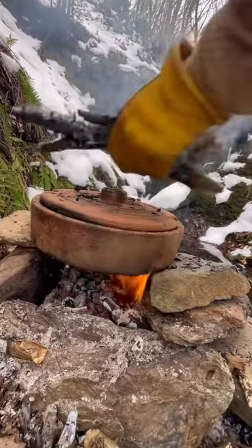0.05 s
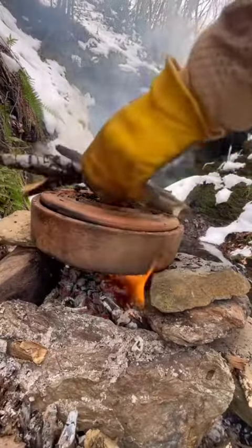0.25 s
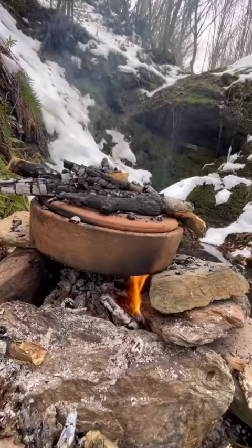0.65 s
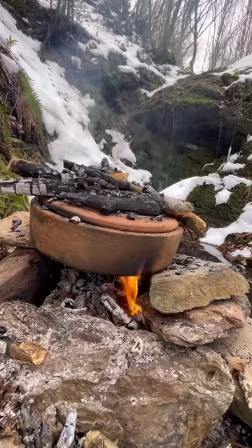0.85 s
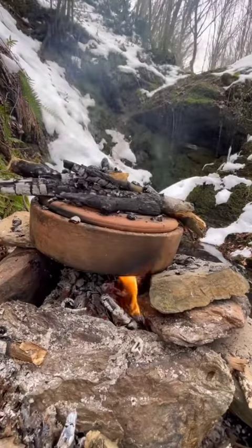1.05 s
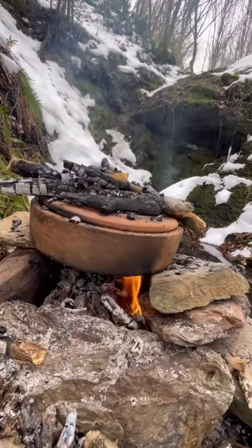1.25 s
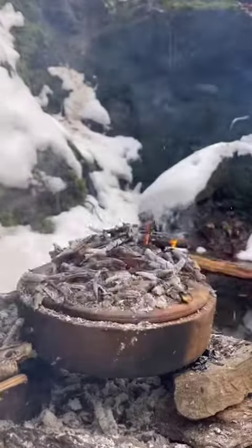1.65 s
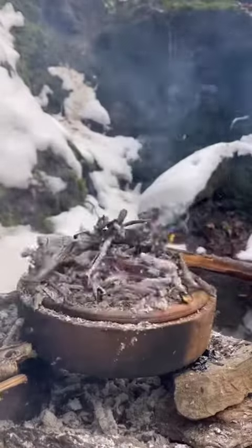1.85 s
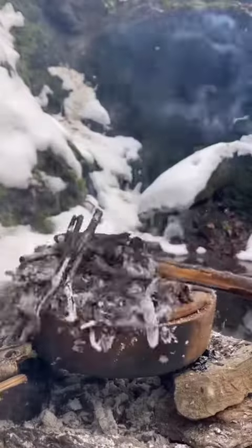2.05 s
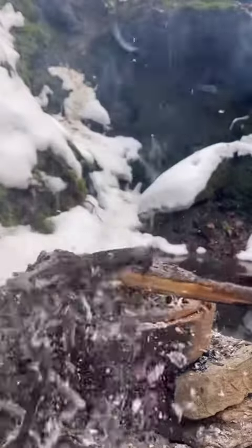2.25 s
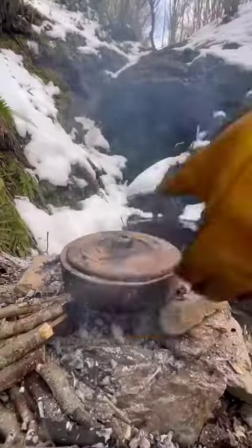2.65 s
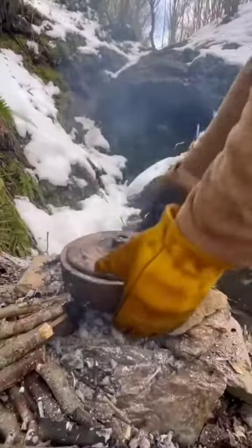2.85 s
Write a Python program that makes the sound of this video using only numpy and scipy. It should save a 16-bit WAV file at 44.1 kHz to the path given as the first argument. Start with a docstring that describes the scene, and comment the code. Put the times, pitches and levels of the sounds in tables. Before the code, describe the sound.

Charred logs clack and crunch onto a clay lid from about 0.2 to 0.6 seconds, making it ring briefly. A quiet outdoor fire hisses, with embers ticking. From 1.7 seconds a stick pushes ash and burnt wood off in a growing, gritty rush, with a log thud at 2.1, then clinks, raps and low rumble. Ash lands with soft thumps near 2.6 seconds and flakes settle, all heard up close.

```python
"""An outdoor fire hisses and murmurs under a pot while charcoal rustles in a glove. Charred logs
are set down on the pot's clay lid: they crunch, clack and make the clay ring as they rock to rest.
Embers tick and flames flap softly. Then a stick pushes the burnt wood and ash off the lid in a
gritty, sliding rush: chunks clink, logs bump and the stick raps the clay over a low rumble.
Last, heaps of ash land with soft thumps and the loose flakes settle."""
import sys
import numpy as np
from scipy import signal
from scipy.fft import rfft, irfft
from scipy.io import wavfile

SR = 44100
rng = np.random.default_rng(int(sys.argv[2]) if len(sys.argv) > 2 else 0)


def transcribe(u):
    """Save the signal u as a 16-bit wav file named by the first command-line argument.

    u: samples, shape (n,) or (channels, n), limited to [-1, 1]; the rate is SR.
    q: integer samples, one column per channel.
    """
    v = np.clip(np.atleast_2d(u).T, -1, 1)
    q = np.round(v * 32767).astype(np.int16)
    wavfile.write(sys.argv[1], SR, q)


N = 132300
T = np.arange(N) / SR


def amp(db):
    """Turns decibels into a number to multiply a sound by."""
    return 10 ** (np.asarray(db) / 20)


def unit(x):
    """Scales a sound to an average power of 1."""
    return x / np.sqrt(np.mean(x ** 2) + 1e-20)


def level(points):
    """A loudness curve drawn through (t/s, level/dB) points."""
    return amp(np.interp(T, *np.transpose(points)))


def colour(x, points):
    """Shapes the bass and treble of a sound to follow (f/Hz, level/dB) points."""
    hz, db = np.transpose(points)
    log_hz = np.log(abs(np.fft.fftfreq(4096, 1 / SR)) + 1)
    log_gain = np.log(amp(np.interp(log_hz, np.log(hz + 1), db)))
    response = np.exp(np.conj(signal.hilbert(log_gain)))  # nothing rings ahead of the sound
    taps = np.fft.ifft(response).real[:2048]
    return signal.fftconvolve(x, taps)[:len(x)]


def noise(points):
    """Steady noise with the tone given by (f/Hz, level/dB) points."""
    return unit(colour(rng.standard_normal(N), points))


def spread(mid, side):
    """Makes left and right channels: bass in the middle, treble wider."""
    # stereo width, as the gain of the side signal: f/Hz, level/dB
    width = [(30, -28), (130, -35), (400, -14.5), (1000, -10.5), (2000, -32.5), (3000, -8.5), (4500, -7),
             (6500, -4), (9000, -10.5), (12000, -10)]
    side = colour(side, width)
    return np.array([mid + side, mid - side])


def add(mix, s, sound):
    """Mixes a sound in, starting at s seconds."""
    part = mix[max(round(s * SR), 0):][:len(sound)]
    part += sound[:len(part)]


def ring(modes, build_cycles=0.91):
    """A struck object: each of its tones (f/Hz, level/dB, fade/s) swells, then falls 60 dB per fade."""
    t = T[:SR // 3]
    out = np.zeros(len(t))
    for hz, db, fade_s in modes:
        swell = 1 - np.exp(-(t * hz / build_cycles) ** 2)
        out += amp(db - 60 * t / fade_s) * swell * np.sin(2 * np.pi * hz * t)
    return out


def burst(fade_s, rise_s):
    """The loudness curve of a brittle snap: a quick rise, and a fall of 60 dB in fade_s."""
    t = T[:SR // 4]
    return np.minimum(t / rise_s, 1) * amp(-60 * t / fade_s)


def grit(points, per_s, spread_db, smooth):
    """Tiny cracks of uneven size, in stereo; smooth is the share of plain hiss mixed in."""
    size = amp(spread_db * np.minimum(rng.exponential(1, N), 5))
    size *= rng.random(N) < per_s / SR
    pair = []
    for _ in range(2):
        cracks = unit(size * rng.choice([-1, 1], N))
        grains = np.sqrt(1 - smooth) * cracks + np.sqrt(smooth) * rng.standard_normal(N)
        pair.append(unit(colour(grains, points)))
    return spread(*pair)


def flutter(rate_hz, depth_db):
    """A random wobble in loudness, up to about rate_hz."""
    hz = np.fft.rfftfreq(N, 1 / SR)
    band = hz / (hz + rate_hz / 10) / (1 + (hz / rate_hz) ** 4)
    wobble = irfft(rfft(rng.standard_normal(N)) * band, N)
    return amp(depth_db * unit(wobble))


def patchy(x, depth_db, patch_s, patch_hz):
    """Gathers grains into clusters: small patches of time and pitch swell and fade by chance."""
    spectrum = signal.stft(x, nperseg=256, noverlap=192)[2]
    shape = spectrum.shape[1:]
    along_time = np.fft.rfftfreq(shape[1], 64 / SR)
    along_pitch = np.fft.fftfreq(129, SR / 256)[:, None]
    blur = np.exp(-(along_time * patch_s) ** 2 - (along_pitch * patch_hz) ** 2)
    patches = np.fft.irfft2(np.fft.rfft2(rng.standard_normal(shape)) * blur, shape)
    spectrum *= amp(depth_db * unit(patches))
    return unit(signal.istft(spectrum, nperseg=256, noverlap=192)[1][:, :N])


def chips(rows, fade_s, rise_s, q):
    """Brittle pieces: each (t/s, level/dB, f/Hz) row is a snap of noise; higher q, clearer pitch."""
    out, snap = np.zeros(N), burst(fade_s, rise_s)
    for s, db, hz in rows:
        edges_hz = hz * np.exp(np.array([-.5, .5]) / q)
        band = signal.butter(3, edges_hz, btype="band", fs=SR)
        pitched_noise = unit(signal.lfilter(*band, rng.standard_normal(N // 8)))
        add(out, s, amp(db) * snap * pitched_noise[-len(snap):])
    return out


def fire_hiss():
    """The fire gives off a fine, slightly grainy hiss."""
    # tone of the hiss: f/Hz, level/dB
    tone = [(30, -35.5), (70, -25.5), (200, -25.5), (400, -27.5), (700, -11.5), (1200, -13), (1800, -5),
            (2500, 0.5), (3700, -5), (5000, -1.5), (6150, -0.5), (6900, -5.5), (7700, -0.5), (8500, -6),
            (10000, 2), (11900, -0.5), (12400, -7), (13300, -45)]
    # loudness of the hiss: t/s, level/dB
    loudness = [(0, -38.5), (.65, -39.5), (.675, -46.5), (.72, -43.5), (.95, -42.5), (1.15, -44),
                (1.45, -44.5), (1.7, -43), (2.75, -43), (3, -56.5)]
    hiss = grit(tone, per_s=1500, spread_db=-0.5, smooth=0.92)
    return patchy(hiss, depth_db=1.7, patch_s=0.049, patch_hz=600) * level(loudness)


def flames():
    """The flames murmur, swelling and lulling, and flap softly under the pot."""
    # tone of the murmur: f/Hz, level/dB
    murmur_tone = [(40, -12), (150, -4), (260, -3.5), (420, -10), (700, 1.5), (1100, -6.5), (1600, -7.5),
                   (3000, -29.5)]
    # loudness of the murmur: t/s, level/dB
    murmur_loudness = [(0, -67.5), (.63, -61.5), (.70, -74), (.78, -64), (.89, -64), (1.01, -77),
                       (1.13, -63), (1.26, -86), (1.34, -66), (1.42, -69), (1.51, -63), (1.7, -60),
                       (3, -61)]
    # deep tone of a flap: f/Hz, level/dB
    flap_tone = [(25, -8), (65, 1), (130, -4), (230, -2), (330, -20), (700, -35)]
    # single flaps of flame: t/s, level/dB, length/s
    flaps = [(0.78, -60, 0.018), (.9, -75, 0.032), (1.145, -69, .025), (1.345, -70.5, .012),
             (1.455, -61, 0.009), (1.484, -65, .017), (1.555, -73, 0.014), (1.608, -70, .015)]
    swells = sum(amp(db) * np.exp(-((T - s) / length) ** 2 / 2) for s, db, length in flaps)
    return noise(murmur_tone) * level(murmur_loudness) + noise(flap_tone) * swells


def loose_flakes():
    """Charcoal rustles in the glove at the start, and ash settles at the end."""
    # tone of the flakes: f/Hz, level/dB
    tone = [(30, -21), (70, -9.5), (200, -17), (400, -5.5), (900, -5), (2800, 0.5), (4500, 2), (5800, 4),
            (8400, -1), (10000, 0.5), (11900, 10), (12500, -6), (14500, -33)]
    # loudness of the rustle: t/s, level/dB
    loudness = [(0, -42.5), (.19, -38), (.26, -38), (.31, -39.5), (.45, -35.5), (.53, -37.5), (.65, -42),
                (.67, -66), (2.7, -59.5), (2.75, -44), (2.88, -42), (3, -45)]
    flakes = grit(tone, per_s=2300, spread_db=2.5, smooth=0.76)
    flakes = patchy(flakes, depth_db=1.9, patch_s=0.053, patch_hz=697)
    return flakes * level(loudness) * flutter(rate_hz=90, depth_db=2.2)


def charcoal_crunches():
    """Charcoal cracks and scuffs in short bursts of crisp grains that swell, hold and stop."""
    # single crunches: t/s, level/dB, length/s
    crunches = [(0.073, -31, 0.003), (0.202, -30.5, 0.032), (0.219, -21.5, 0.0096), (0.246, -21.5, 0.016),
                (0.263, -28, 0.016), (0.359, -31, 0.029), (0.3995, -24.5, 0.0042), (0.429, -20.5, 0.0077),
                (0.4385, -26.5, 0.0049), (0.4453, -24, 0.007), (0.458, -32, 0.0074),
                (0.5125, -31.5, 0.0071), (0.5537, -30, 0.006), (0.617, -44, 0.0073), (1.719, -41, 0.0036),
                (1.739, -31.5, 0.013), (1.816, -44, 0.005), (2.14, -43, 0.0044), (2.245, -24.5, 0.0044),
                (2.2877, -23, 0.0016), (2.2905, -16, 0.0031), (2.338, -24, 0.004), (2.347, -16, 0.0059),
                (2.367, -15.5, 0.0044), (2.425, -29, 0.022), (2.434, -20, 0.0055), (2.439, -30, 0.0054),
                (2.459, -20, 0.0036), (2.471, -23, 0.0046), (2.489, -16, 0.0038), (2.527, -25, 0.0035),
                (2.535, -22.5, 0.0084), (2.5595, -12.5, 0.0035), (2.588, -23, 0.0077),
                (2.6092, -14.5, 0.0064), (2.688, -23, 0.004), (2.71, -25, 0.0053), (2.717, -21.5, 0.0052)]
    # tone of breaking charcoal: f/Hz, level/dB
    tone = [(60, -17), (400, -5), (900, -13.5), (1800, -5.5), (3500, -6.5), (4700, -5), (5800, -2),
            (7300, -4), (8400, -4.5), (9800, 1), (11800, -1), (12500, -9), (15000, -36)]
    power = np.zeros(N)
    for s, db, length in crunches:
        progress = T[:SR // 10] / length
        swell = np.minimum(progress / 0.26, 1)
        add(power, s, (amp(db) * swell / (1 + progress ** 4)) ** 2)
    return grit(tone, per_s=3200, spread_db=1.5, smooth=.35) * np.sqrt(power)


def load_rumble():
    """The load on the lid rumbles as it shifts."""
    # tone of the rumble: f/Hz, level/dB
    tone = [(20, -34.5), (38, -18.5), (55, 3), (78, -3.5), (110, -3), (200, -13.5), (330, -5), (600, -30),
            (2000, -58)]
    # loudness of the rumble: t/s, level/dB
    loudness = [(0, -82), (.15, -62), (.21, -41.5), (.25, -38), (.32, -47), (.45, -40), (.52, -42),
                (.6, -70), (.7, -91.5), (1.68, -80), (1.73, -50.5), (2.03, -55), (2.1, -36.5), (2.25, -40),
                (2.46, -33.5), (2.61, -46.5), (2.7, -48), (2.78, -67), (3, -67)]
    return spread(noise(tone), noise(tone)) * level(loudness)


def lid_knocks():
    """Logs clack and ring the lid; their weight retunes and damps it, and soft blows sound duller."""
    # logs hitting the lid: t/s, level/dB, treble limit/Hz, extra clack/dB, pitch/ratio, fade/ratio
    knocks = [(0.2257, -.5, 1460, -3.5, 1.01, 1), (0.2507, -5, 1700, 2, 1.01, 0.96),
              (0.2658, -4, 3400, 0.5, 0.99, 1), (0.2766, -14.5, 3500, 0, 1.01, .8),
              (0.309, -19.5, 630, -17.5, 0.92, 0.72), (0.3309, -11.5, 520, -11.5, .98, 1),
              (0.3440, -6, 614, 2.5, 1.02, 0.69), (0.3683, -5, 1000, 4, 1.02, 0.92),
              (0.402, -12.5, 540, -16, 1.0, .75), (0.421, -11, 524, 4.5, 1, 0.89),
              (0.430, -22.5, 710, -7, .85, .8), (0.441, -13.5, 505, -15, 0.99, 1)]
    # ringing tones of the clay lid and pot: f/Hz, level/dB, fade/s
    lid_modes = [(205.2, -22, .04), (344.5, -11.5, 0.059), (400, -12.5, 0.054), (440, -2.5, 0.054),
                 (463.4, -7.5, 0.083), (510, -15, 0.044), (590, -24.5, 0.051), (798, -20, .075),
                 (826, -21.5, 0.05), (1011, -13.5, 0.062), (1053.5, -16.5, 0.071), (1080, -22, 0.056),
                 (1592, -15.5, 0.089), (1980, -25.5, .06), (2033, -17, .07), (2323, -18.5, .05),
                 (2570, -25.5, .05), (2712, -18, 0.053)]
    # tone of the dry wood's clack: f/Hz, level/dB
    clack_tone = [(60, -19.5), (200, -4.5), (420, -10), (700, -12), (900, -10), (1200, -6), (1450, -9.5),
                  (1800, -0.5), (2300, 0.5), (2700, 1.5), (3300, -22), (8000, -35.5)]
    lid_gain_db, clack_gain_db = 4, -7.5
    out, snap = np.zeros(N), burst(fade_s=.06, rise_s=0.0037)
    for s, db, limit_hz, extra_db, pitch, fade_ratio in knocks:
        # each contact point shifts the pitch and strength of the tones a little
        chance = rng.standard_normal((len(lid_modes), 2))
        modes = [(hz * pitch * (1 + 0.0059 * detune), mode_db + 0.83 * boost, fade_s * fade_ratio)
                 for (hz, mode_db, fade_s), (detune, boost) in zip(lid_modes, chance)]
        lid = ring(modes, build_cycles=1.41)
        lid *= flutter(rate_hz=170, depth_db=2)[:len(lid)]  # rough wood chatters on the clay
        lid = signal.lfilter(*signal.butter(4, limit_hz, fs=SR), lid)
        clack = snap * unit(colour(rng.standard_normal(len(snap)), clack_tone))
        clack = signal.lfilter(*signal.butter(2, limit_hz, fs=SR), clack)
        add(out, s, amp(db + lid_gain_db) * lid)
        add(out, s, amp(db + clack_gain_db + extra_db) * clack)
    return out


def ember_ticks():
    """Embers tick: each is a tiny snap with a quieter, higher one on top."""
    # single ticks: t/s, level/dB, f/Hz
    ticks = [(0.690, -28, 2510), (1.049, -39.5, 2650), (1.1985, -43, 2380), (1.2792, -44, 2600),
             (1.3273, -43, 2230), (1.376, -39.5, 2300), (1.467, -37, 2380), (1.501, -35.5, 2080),
             (1.504, -35, 2305)]
    overtones = [(s, db - 8, hz * 4.3) for s, db, hz in ticks]
    return chips(ticks + overtones, fade_s=0.046, rise_s=0.001, q=3.2)


def sliding_ash():
    """Fine ash and coarser cinders slide along as the stick pushes them."""
    # tone of the fine ash: f/Hz, level/dB
    ash_tone = [(80, -20), (150, -6), (230, -18.5), (320, -7.5), (450, -10.5), (800, -13.5), (1700, -13),
                (2600, -9), (4300, -10.5), (4850, -15), (5300, -10.5), (7400, -7.5), (8400, -14.5),
                (9600, -2.5), (11000, -1), (12000, -0.6), (12300, -16), (13600, -23), (15000, -40.5)]
    # tone of the cinders: f/Hz, level/dB
    cinder_tone = [(200, -21.5), (900, -6), (1600, 3), (3500, 0), (6500, -4), (8500, -12), (12000, -13.5),
                   (13500, -44)]
    # flow of the pushed ash: t/s, level/dB
    flow = [(1.712, -62), (1.722, -38), (1.80, -33), (1.89, -27.5), (2.03, -25.5), (2.09, -29.5),
            (2.16, -27), (2.28, -28), (2.315, -22), (2.40, -19.5), (2.445, -16.5), (2.51, -23),
            (2.555, -18), (2.588, -26.5), (2.598, -36.5), (2.608, -30), (2.62, -25.5), (2.64, -27.5),
            (2.715, -25.5), (2.733, -28), (2.745, -45)]
    ash = grit(ash_tone, per_s=4500, spread_db=3.5, smooth=0.37)
    ash = patchy(ash, depth_db=2.5, patch_s=0.027, patch_hz=620)
    cinders = amp(-12) * grit(cinder_tone, per_s=700, spread_db=1.0, smooth=0)
    return (ash + cinders) * level(flow) * flutter(rate_hz=62, depth_db=0.77)


def ash_thumps():
    """Heaps of ash land, each with one short, deep tone."""
    # heaps landing: t/s, level/dB, f/Hz
    thumps = [(1.717, -39.5, 169), (2.622, -22.5, 79), (2.647, -23, 56.5)]
    out, fade_s = np.zeros(N), 0.14
    for s, db, hz in thumps:
        add(out, s, ring([(hz, db, fade_s)]))
    return out


def charcoal_clinks():
    """Chunks of charcoal hit each other with short, bright snaps."""
    # chunks colliding: t/s, level/dB, f/Hz
    clinks = [(1.826, -27, 2570), (2.1275, -26.5, 2620), (2.146, -24.5, 2330), (2.2855, -21.5, 1830),
              (2.291, -24.5, 1500), (2.322, -23.5, 1460), (2.348, -28, 3400), (2.3475, -34, 5400),
              (2.355, -23, 1700), (2.394, -27, 2370), (2.397, -25, 4200), (2.437, -21, 2820),
              (2.462, -31, 1000), (2.5255, -18, 6000), (2.526, -21, 3860), (2.543, -22, 5500),
              (2.663, -22, 4600), (2.7155, -23, 2700)]
    return chips(clinks, fade_s=0.028, rise_s=0.00049, q=2.6)


def log_bumps():
    """Burnt logs thud as the stick shoves them; one piece of charcoal rings on after the hardest bump."""
    # logs tipping over: t/s, level/dB, pitch/ratio
    bumps = [(2.044, -26.5, 1.3), (2.1288, -13, 1.046), (2.18, -29, 1.2), (2.977, -38.5, 1.04)]
    # dull tones of a burnt log: f/Hz, level/dB, fade/s
    log_modes = [(327, -0.5, 0.09), (422, -1.5, 0.031), (467, 2.5, 0.031), (546, 0, 0.02),
                 (680, -2.5, 0.022), (880, -6, 0.018), (1220, -13, 0.019)]
    out = np.zeros(N)
    for s, db, pitch in bumps:
        thud = ring([(hz * pitch, mode_db, fade_s) for hz, mode_db, fade_s in log_modes])
        add(out, s, amp(db) * thud)
    ping_s, ping_hz, ping_db, ping_fade_s = 2.1285, 8785, -35, .8
    add(out, ping_s, ring([(ping_hz, ping_db, ping_fade_s)]))
    return out


def stick_raps():
    """The stick strikes the clay lid with short, hard raps."""
    # single strikes: t/s, level/dB
    strikes = [(2.286, -23), (2.348, -25), (2.4491, -20), (2.5605, -21.5), (2.612, -19)]
    # tones of the stick on clay: f/Hz, level/dB, fade/s
    rap_modes = [(296, -6, 0.013), (520, -3, 0.018), (986, -5, 0.024), (1600, -2.5, 0.032),
                 (2360, -4, 0.022), (3430, -4.5, 0.03), (4740, -14, 0.012), (5810, -7, 0.013),
                 (7230, -3, 0.014)]
    out, rap = np.zeros(N), ring(rap_modes, build_cycles=0.71)
    for s, db in strikes:
        add(out, s, amp(db) * rap)
    return out


def rock_echo(x):
    """The rocks around the fire scatter back a faint, short echo."""
    echo_db, fade_s, delay_s = -30, 0.3, .006
    t = T[:SR // 3]
    tail = rng.standard_normal((2, len(t))) * amp(-60 * t / fade_s) * (t > delay_s)
    tail /= np.linalg.norm(tail[0])
    return amp(echo_db) * signal.fftconvolve(x, tail, axes=1)[:, :N]


def scene():
    """Mixes all the sounds, heard from close by; only the hits and crunches get an echo."""
    hits = lid_knocks() + ash_thumps() + log_bumps() + stick_raps()
    hits = hits + charcoal_crunches() + charcoal_clinks()
    rumble = load_rumble()
    fire = fire_hiss() + ember_ticks() + flames()
    return hits + rock_echo(hits) + rumble + fire + loose_flakes() + sliding_ash()


def record(dry):
    """Rounds off the loudest peaks, then removes the very highest treble."""
    ceiling, top_hz = .95, 15150
    rounded = dry / (1 + (dry / ceiling) ** 6) ** (1 / 6)
    treble_cut = signal.firwin(511, top_hz, window=("kaiser", 9), fs=SR)
    return signal.oaconvolve(rounded, treble_cut[None], "same")


dry = scene()
out = record(dry)
transcribe(out)
```